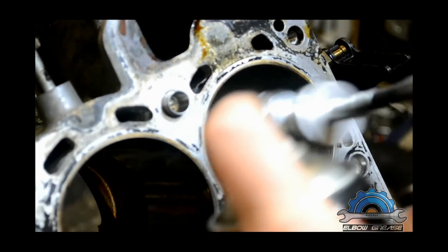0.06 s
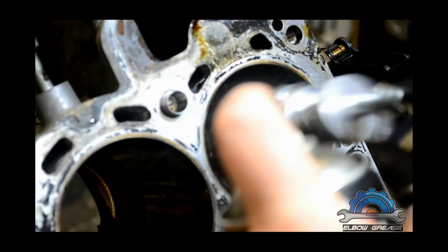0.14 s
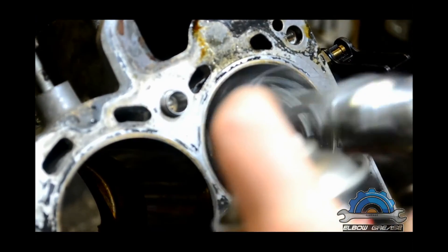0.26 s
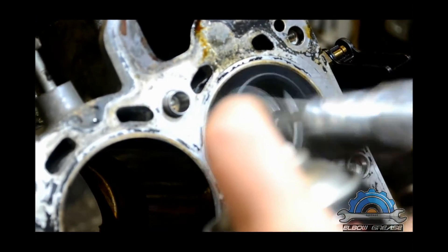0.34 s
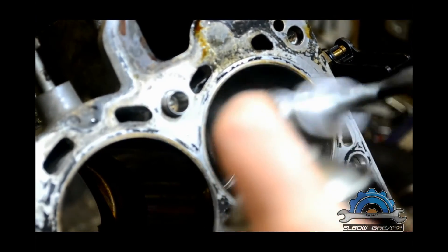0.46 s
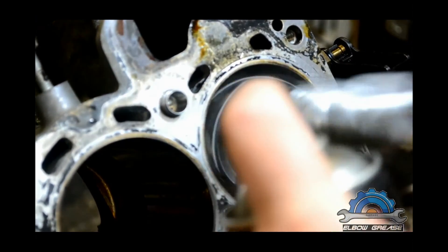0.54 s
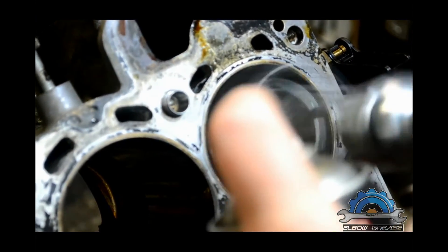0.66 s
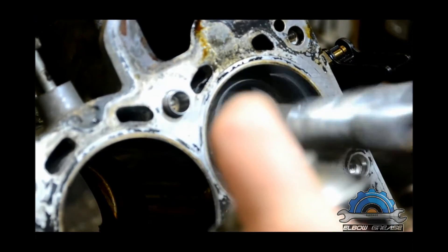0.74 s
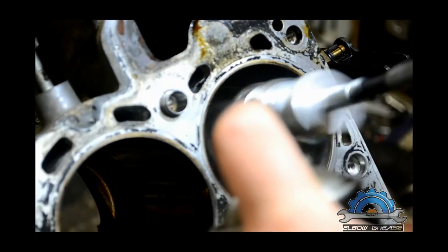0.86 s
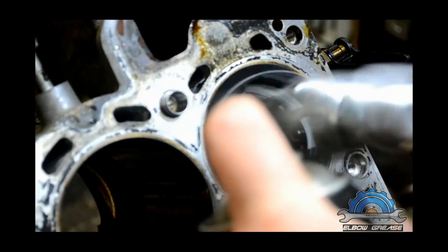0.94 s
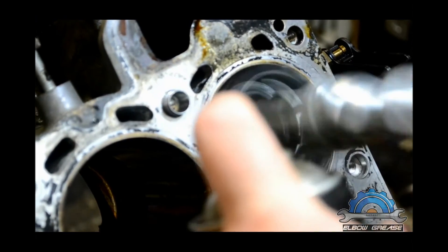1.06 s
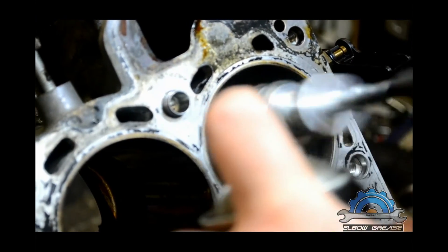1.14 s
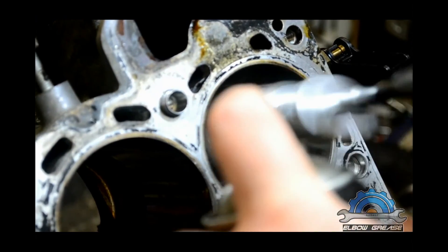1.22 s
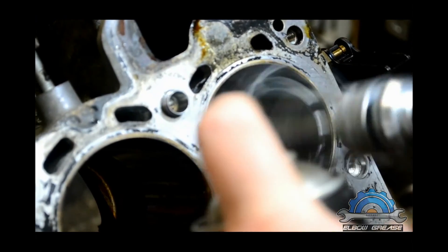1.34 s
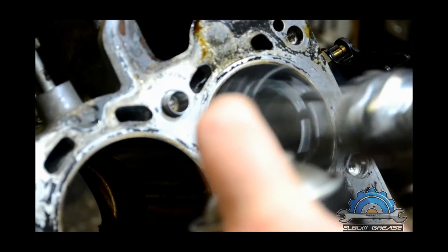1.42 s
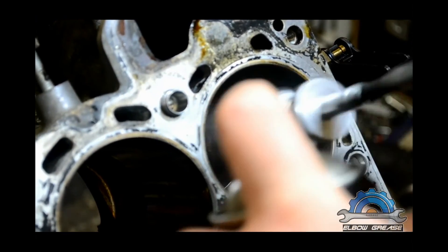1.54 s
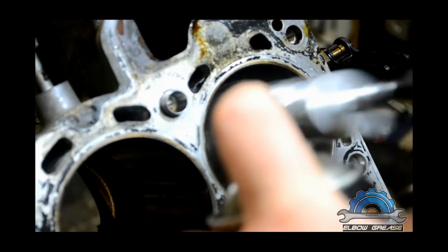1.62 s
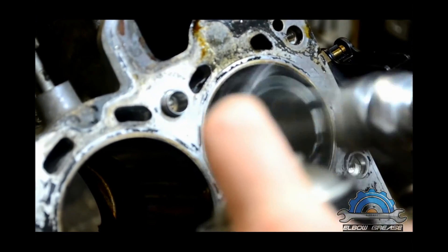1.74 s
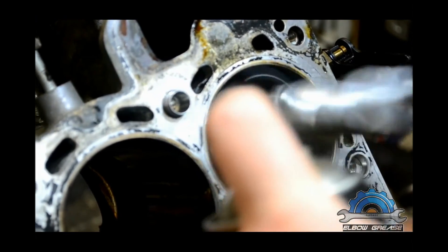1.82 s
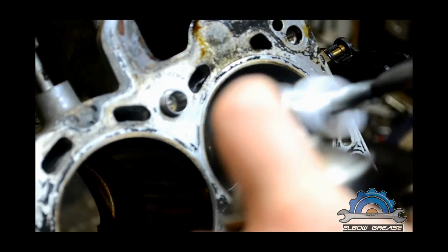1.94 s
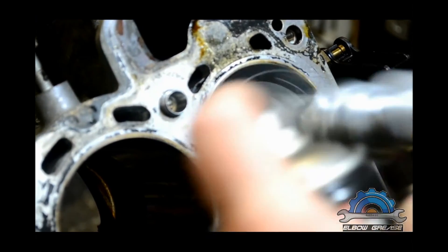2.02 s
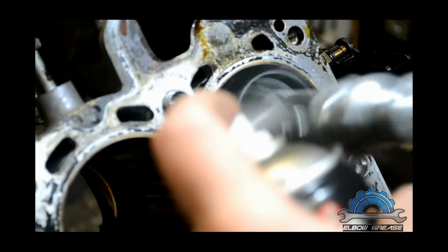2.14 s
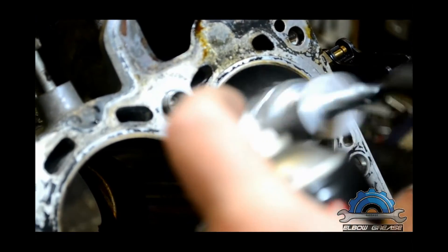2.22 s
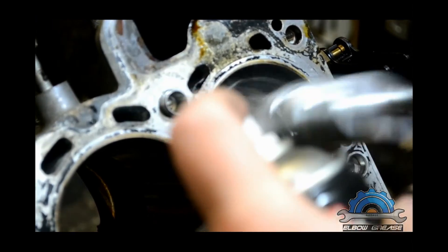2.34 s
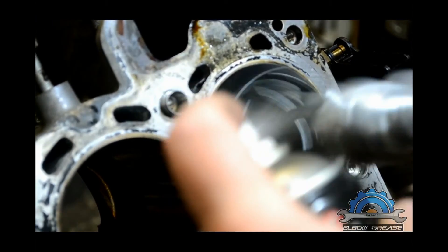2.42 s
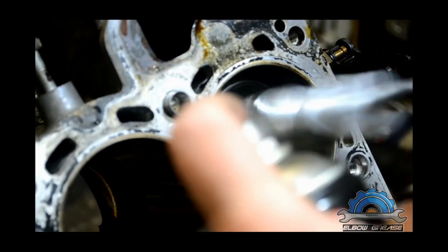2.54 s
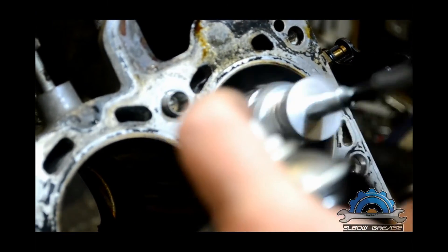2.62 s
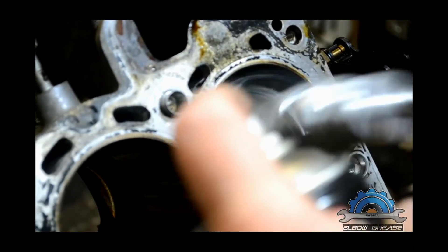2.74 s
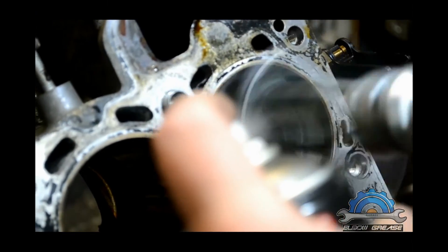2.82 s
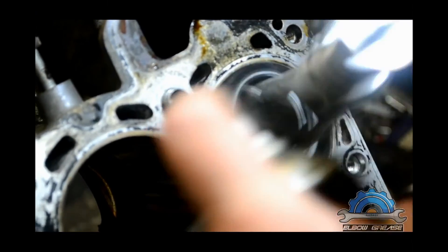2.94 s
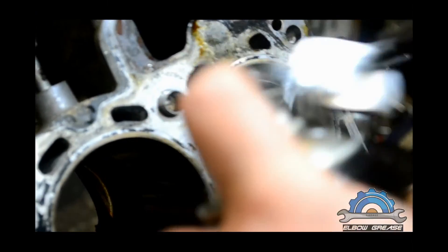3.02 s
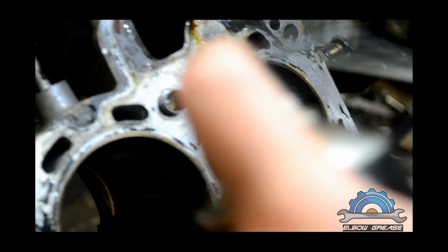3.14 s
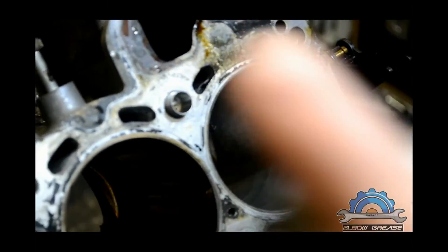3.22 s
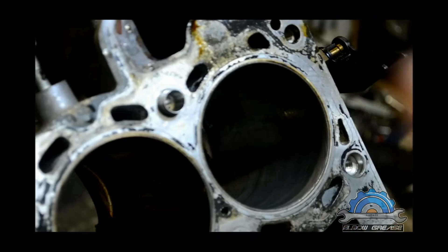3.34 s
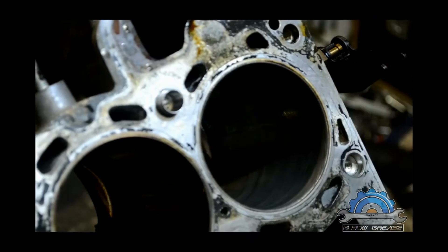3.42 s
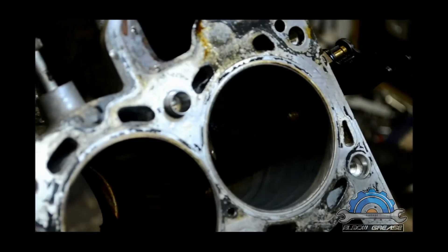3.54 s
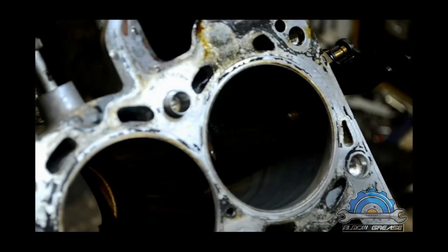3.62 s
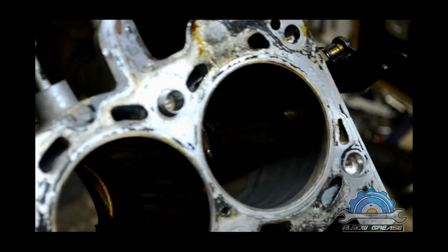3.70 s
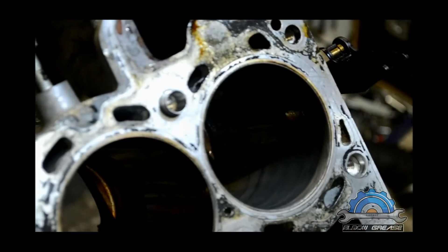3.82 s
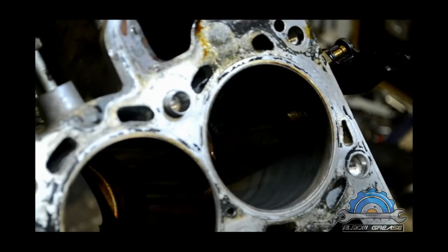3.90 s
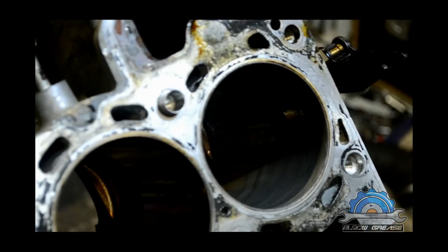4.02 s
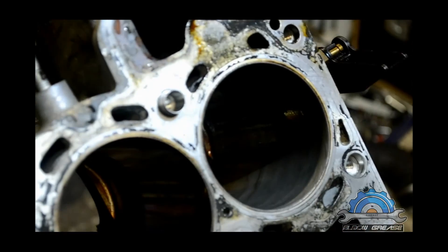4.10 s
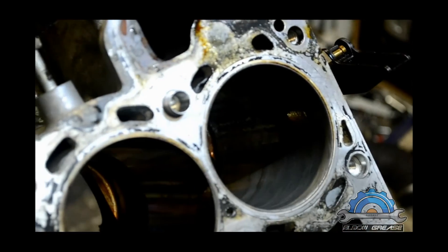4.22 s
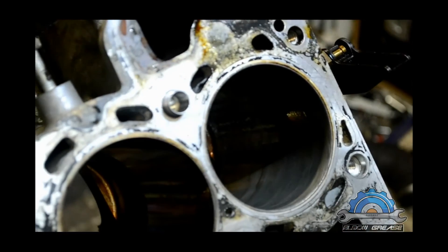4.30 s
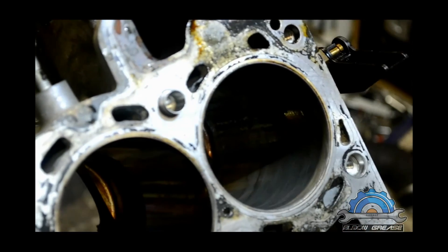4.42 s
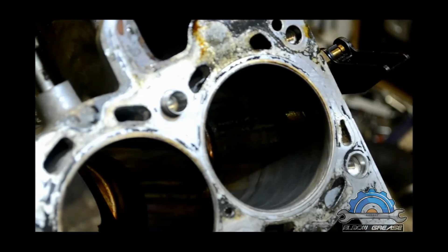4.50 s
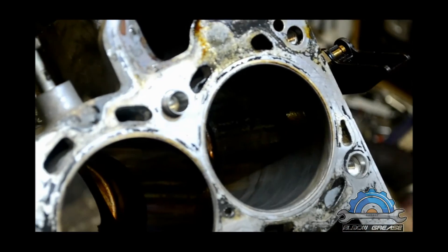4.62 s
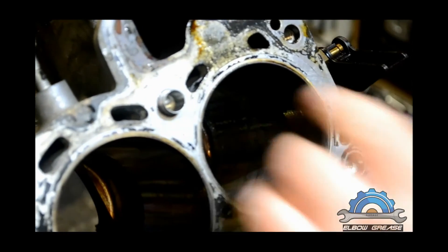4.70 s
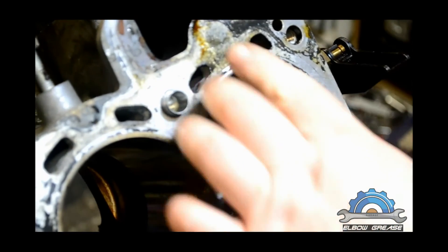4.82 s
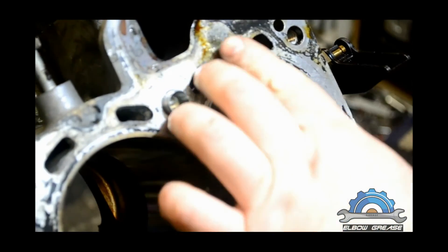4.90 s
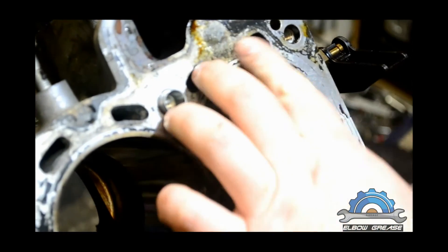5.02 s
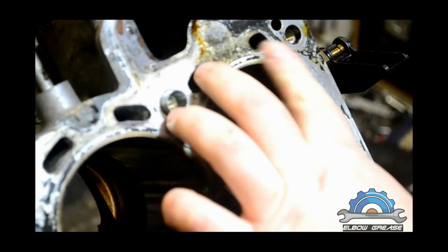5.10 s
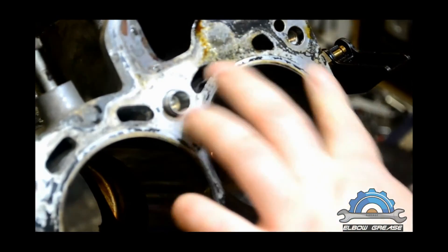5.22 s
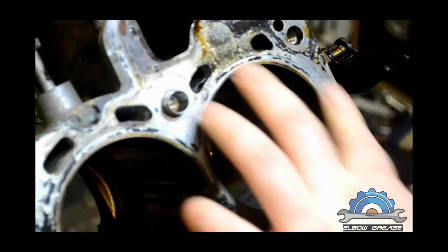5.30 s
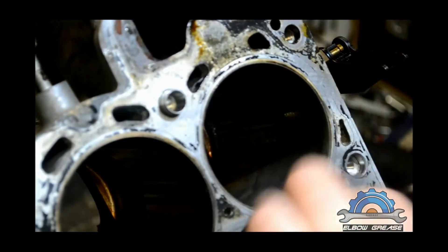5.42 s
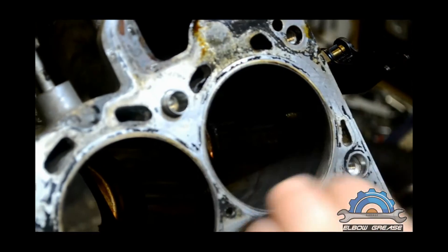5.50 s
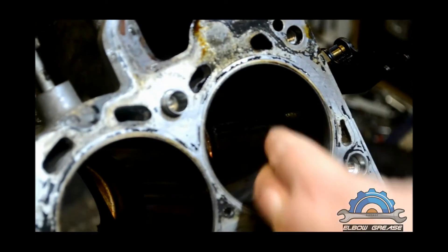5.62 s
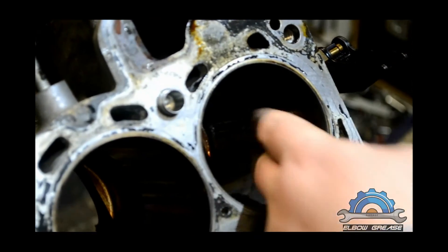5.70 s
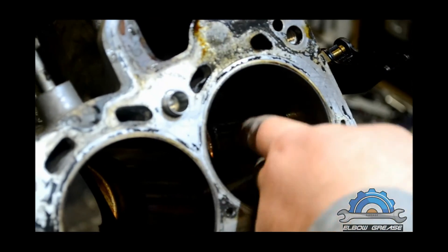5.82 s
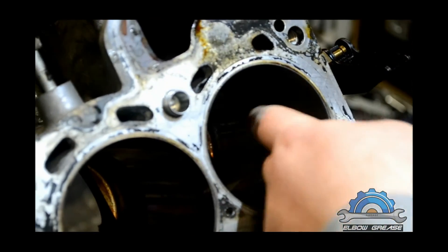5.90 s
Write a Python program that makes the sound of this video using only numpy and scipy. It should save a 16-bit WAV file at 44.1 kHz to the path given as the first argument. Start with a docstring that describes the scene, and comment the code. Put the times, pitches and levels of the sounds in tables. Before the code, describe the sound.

One close microphone, the same in both channels: loud, bright abrasive grinding with a high gear whine that sags and returns on every stroke, the bore ringing as it binds. After almost three seconds the hone slaps out of the cylinder and the drill dies quickly. Sparse thin clicks follow, then very quiet hand rubbing and cloth rustle over low garage room noise.

```python
"""In a garage, an electric drill spins a stone hone up and down an engine bore, close to one microphone.
The gears are wavering tones that sag on each stroke; the stones are bursts of shaped noise over the
drill's rush; the metal rings as noise through narrow resonances. The hone clatters out of the bore and
the drill stops: decaying bursts of noise. Then the loose arms click, as ticks with short tones, and a
hand brushes over the block, as soft swells of noise. Quiet room noise lies under it all."""
import sys
import numpy as np
from scipy import signal
from scipy.fft import rfft, irfft, next_fast_len
from scipy.io import wavfile
from scipy.ndimage import uniform_filter1d, map_coordinates

SR = 44100
rng = np.random.default_rng(int(sys.argv[2]) if len(sys.argv) > 2 else 0)


def wrap_up_sound(samples):
    """Save the sound to the file named by the first command line argument, as 16-bit audio."""
    columns = np.atleast_2d(samples).T
    # keep every value between -1 and 1, then stretch to whole-number steps
    tamed = np.clip(columns, -1, 1)
    steps = np.round(tamed * 32767).astype(np.int16)
    wavfile.write(sys.argv[1], SR, steps)


N = 262519  # length in samples

# Each stroke runs free, then binds: middle of free run t/s, middle of bind t/s, bind length t/s,
# sag of the whine f/Hz, rise of the low ring level/dB, rise of the middle ring level/dB
STROKES = [(0.02, 0.242, .15, 66.5, 11, 10), (0.4, 0.604, 0.16, 100.7, 8.5, 7.5),
           (0.764, 0.956, 0.14, 87, 6.5, 9.5), (1.1, 1.321, .11, 84.8, 6.5, 11.5),
           (1.47, 1.676, .14, 61.4, 10, 10), (1.812, 2.043, 0.099, 59.8, 16, 8.5),
           (2.173, 2.404, .1, 58, 10.5, 11), (2.526, 2.745, .06, 74.8, 20, 11.5)]
# Gear mesh when running free, drifting with the trigger: t/s, pitch f/Hz
FREE_PITCH = [(0, 2515), (.45, 2516), (.79, 2500), (1.18, 2534), (1.5, 2522), (1.85, 2515), (2.2, 2508),
              (2.6, 2529)]
# The whine dips briefly: middle t/s, length t/s, change of level/dB
WHINE_DIPS = [(2.3, .06, -9), (2.673, .035, -7)]
# Weaker lines of the drive: multiple of the motor speed, relative level/dB
DRIVE_LINES = [(.714, -44), (3.58, -25), (4, -26), (5, -32), (6, -22.5), (6.79, -31.5), (8.59, -19),
               (18, -20), (27.6, -28.5)]
# Spectrum of the grinding stones: f/Hz, relative level/dB per Hz
GRIT_SPECTRUM = [(1900, -18.5), (2600, -5), (3060, -7), (3500, -3.5), (4500, -3.5), (5050, 0), (5600, -5.5),
                 (6900, -2.5), (7900, -4.5), (8800, -3), (9300, -4.5), (10400, -5), (16000, -6.5)]
# Spectrum of the drill's rush: f/Hz, relative level/dB per Hz
RUSH_SPECTRUM = [(76, -64), (130, -27.5), (193, -23.5), (264, -25.5), (346, -12.5), (421, -14.5),
                 (590, -10), (867, -10), (1130, -8), (1430, -5.5), (1550, -11.5), (1780, -7), (2100, -3),
                 (2730, -21), (4620, -120)]
# Resonances that friction drives harder, in three groups:
# centre f/Hz, distance from centre to half gain f/Hz, relative level/dB
LOW_RING = [(1533, 22, -15), (1582, 13, 2.5), (1620, 41, -17)]
MID_RING = [(2110, 30, -15), (2203, 16, -0.5), (2310, 35, -16), (2497, 70, -9.5)]
HIGH_RING = [(4092, 16, 4), (4100, 30, 3.5), (4230, 100, -9), (4314, 40, 0), (5056, 130, -20.5),
             (6780, 90, -18.5), (8660, 50, -12.5), (10200, 30, -13)]
# Resonances that ring evenly until the stones lose touch: same columns, f/Hz, f/Hz, level/dB
EVEN_RING = [(758, 16, -9), (1120, 19, -0.5), (1192, 40, -1), (1515, 35, -5), (1690, 42, -2), (2890, 18, 0),
             (3260, 20, -1)]
# The stones scrape over the rim on the way out: middle t/s, length t/s,
# low ring level/dB, middle ring level/dB, high ring level/dB
SCRAPES = [(2.839, .055, -37, -25.5, -31), (2.88, .035, -40, -37, -28), (2.93, 0.078, -28.5, -34.5, -31),
           (3.06, .045, -33, -45.5, -26)]
# The stones catch on the wall, later on their holders, with a short chink: t/s, level/dB, f/Hz
SNAGS = [(0.221, -25, 6400), (.225, -27.5, 5000), (.945, -25, 4014), (1.11, -27.5, 6660),
         (1.236, -26, 2220), (.13, -28.5, 2226), (1.54, -24, 6813), (1.543, -32, 3450),
         (2.396, -35.5, 8776), (3.053, -27.5, 4080), (3.06, -28, 2550), (3.2, -44, 6200),
         (3.284, -52, 2835)]
# The stones strike the rim as the hone comes out: t/s, relative level/dB, relative knock level/dB
CLATTER = [(2.7202, -6, -18.5), (2.7246, -6.5, -14), (2.77, -4, -18.5), (2.806, -9, -9),
           (2.8255, -4, -12.5), (2.8764, -8.5, -22), (2.8938, 0.5, -21.5), (3.0295, -4.5, -18.5),
           (3.0388, -4, -25), (3.0477, -13, -8), (3.087, -14, -14.5), (3.099, -6, -15), (3.1984, -20, -18)]
# Spectrum of the bright crack on the rim: f/Hz, relative level/dB per Hz
RIM_SPECTRUM = [(1000, -20), (2000, -8), (3100, -6), (4700, -2), (7000, -1.5), (10000, -4.5), (16000, -5.5)]
# Spectrum of a dull knock: f/Hz, relative level/dB per Hz
KNOCK_SPECTRUM = [(150, -30), (310, 4.5), (600, 3.5), (1200, 3), (2000, -21.5), (3000, -23)]
# The loose arms click: t/s, relative level/dB, centre of the boost f/Hz, knock gain level/dB
CLICKS = [(3.236, -32.5, 5240, -16), (3.2809, -36, 2850, -15), (3.3306, -29, 8970, -22),
          (3.3584, -31, 6170, -18.5), (3.371, -35, 6300, -15.5), (3.4514, -38, 6380, -21),
          (3.861, -30, 6800, -35), (3.867, -32, 2900, -33), (3.932, -39.5, 6430, -17),
          (4.1833, -39.5, 2610, -8), (4.2306, -35.5, 7900, -22), (4.258, -34, 8900, -27),
          (4.2765, -22.5, 6400, -32), (4.2854, -40, 6100, -23), (4.291, -34, 2850, -25),
          (4.3111, -29, 9600, -25)]
# Spectrum of an arm's tick: f/Hz, relative level/dB per Hz
ARM_SPECTRUM = [(250, -17), (700, -11), (1300, -5), (2350, -1.5), (2850, 1), (3500, -8.5), (5200, 0),
                (6500, 2), (8000, -5), (9700, -3.5), (11000, -13.5), (16000, -20)]
# Ringing tones of an arm: f/Hz, relative level/dB, time to fall 60 dB t/s
ARM_RING = [(2780, 1.5, .13), (2940, 2, 0.18), (2940, -7.5, 0.11), (6140, -12, .11)]
# Skin slides over the block: middle t/s, length t/s, level/dB
BRUSHES = [(4.06, 0.33, -70.5), (4.48, .2, -77), (5.06, .17, -70), (5.22, 0.12, -65), (5.468, 0.034, -70.5),
           (5.865, .245, -62.5)]
# The sleeve rustles as the arm moves: middle t/s, length t/s, relative level/dB
RUSTLES = [(4.62, .44, -53.5), (5.18, 0.38, -55.5), (5.55, 0.33, -58)]
# Spectrum of sliding skin: f/Hz, relative level/dB per Hz
SKIN_SPECTRUM = [(2000, -21), (3300, 0), (5000, -0.5), (7200, -1), (10400, -3.5), (16000, -8)]
# Spectrum of the sleeve: f/Hz, relative level/dB per Hz
CLOTH_SPECTRUM = [(100, -27), (190, -1), (380, 3), (650, -5.5), (1500, -15.5)]
# Spectrum of the garage's quiet: f/Hz, relative level/dB per Hz
AIR_SPECTRUM = [(20, -24.5), (50, -15), (110, -8.5), (190, -4.5), (330, -1), (650, -6), (1100, -8.5),
                (1830, -14.5), (3400, -21.5), (6000, -31), (10000, -36), (16000, -42)]
# Narrow bands of the garage: centre f/Hz, distance to half gain f/Hz, relative level/dB
HUM_BANDS = [(66.5, 12, 0), (195.8, 25, -5.5), (2700, 60, -10)]
# Gain of the microphone: f/Hz, level/dB
MICROPHONE = [(10, 1.5), (7550, 0.5), (7900, -6), (8300, 1.5), (10200, 1), (10800, -7.5), (11750, -28.5),
              (13600, -25.5), (16500, -33.5)]

PINION_TEETH = 9
WHINE_DB, WHINE_DIP_DB = -27, 4  # base level of the gear mesh; its loss under full load
FREE_RISE_DB, FREE_RUN_S = 3.5, 0.15  # the mesh sings out where the hone runs free; for how long
GRIT_DB, RUSH_DB, BIND_DB = -26.5, -36, 0  # grinding, drill's rush, their gain under full load
EXIT_S, CLEAR_S = 2.76, 3.07  # the hone leaves the bore; the stones lose touch with the metal
STOP_S, RUN_DOWN_S = 3.119, 0.33  # the trigger is let go; time to fall 60 dB
COAST_DB, REST_S = -29, 3.37  # coasting hone against the running one; its last fade begins
TOP_HZ = 15750  # nothing passes the microphone from here up


def amp(db):
    """Turn decibels into gain."""
    return 10 ** (np.asarray(db) / 20)


def unit(x):
    """Scale a sound to an rms (average strength) of 1."""
    return x / np.sqrt(np.mean(x ** 2) + 1e-20)


def curves(rows):
    """Draw one curve over the whole scene for each column after the time."""
    s, *columns = np.transpose(rows)
    return [np.interp(np.arange(N) / SR, s, column) for column in columns]


def until(end, fade):
    """Stay at full level up to end, then fall 60 dB every fade seconds."""
    return amp(-60 * np.maximum(np.arange(N) / SR - end, 0) / fade)


def swell(middle, length, steep=3):
    """Rise and fall roundly from 0 to 1, staying above half height for length seconds."""
    distance = np.abs(2 * (np.arange(N) / SR - middle) / length)
    return 0.5 ** (distance ** steep)


def load():
    """Give each stroke's load (0 to 1) over time, one row a stroke."""
    return np.array([swell(s, length) for _, s, length, *_ in STROKES])


def wobble(rate):
    """Draw a smooth random curve through rate random points a second."""
    points = rng.standard_normal(int(N * rate / SR) + 4)
    return map_coordinates(points, [np.arange(N) * rate / SR])


def filtered(x, response):
    """Multiply the spectrum of x by a gain that depends on frequency."""
    m = next_fast_len(len(x) + 8192)
    gain = response(np.fft.rfftfreq(m, 1 / SR))
    return irfft(rfft(x, m) * gain, m)[:len(x)]


def shape(points, hz):
    """Join (Hz, dB) points into a gain curve on a log frequency axis."""
    f, db = np.transpose(points)
    return amp(np.interp(np.log(hz + 1), np.log(f + 1), db, left=-120, right=-120))


def noise(points, size=N):
    """Make noise of rms 1 with the given spectrum."""
    return unit(filtered(rng.standard_normal(size), lambda hz: shape(points, hz)))


def rubbed(modes):
    """Keep resonances ringing by random friction: noise through narrow peaks, rms 1."""
    def response(f):
        return sum(amp(db) / (1 + ((f - hz) / width) ** 2) for hz, width, db in modes)
    return unit(filtered(rng.standard_normal(N), response))


def patchy(x, depth_db):
    """Give x brief random patches of brighter and duller colour."""
    z = signal.stft(x, nperseg=256)[2]
    field = uniform_filter1d(rng.standard_normal(z.shape), size=4, axis=0)  # smooth over frequency
    field = uniform_filter1d(field, size=7, axis=1)  # smooth over time
    return unit(signal.istft(z * amp(depth_db * unit(field)), nperseg=256)[1][:N])


def blow(t, crack_t60, tail_db, tail_t60, attack=0.00051):
    """Shape a contact in time: a short crack, then the ring of metal and room (times in s)."""
    crack = amp(-60 * t / crack_t60)
    tail = amp(tail_db - 60 * t / tail_t60)
    return (1 - np.exp(-t / attack)) * np.hypot(crack, tail)


def add(track, s, sound):
    """Mix a sound into the track at s seconds."""
    part = track[round(s * SR):][:len(sound)]
    part += sound[:len(part)]


def gears(flutter=0.002, rough=0.038, waver_db=1.47, shake_db=1.82, lines_db=-23, line_waver_db=3.5):
    """The meshing teeth sing loudest when free, and sag and fade under load; weaker lines follow."""
    loads, sag_hz = load(), np.transpose(STROKES)[3]
    free = sum(swell(s, FREE_RUN_S) for s, *_ in STROKES)
    pitch_hz = curves(FREE_PITCH)[0] - sag_hz @ loads
    # the teeth pass once each per turn, so the mesh pitch gives the motor's turns
    turns = np.cumsum(pitch_hz * (1 + flutter * wobble(90))) / SR / PINION_TEETH

    dip_db = sum(db * swell(s, length) for s, length, db in WHINE_DIPS)
    level_db = WHINE_DB + FREE_RISE_DB * free - WHINE_DIP_DB * loads.sum(0) + dip_db
    # uneven tooth contact shakes the strength of the mesh tone
    uneven = amp(waver_db * wobble(22.02) + shake_db * wobble(60)) * (1 + rough * wobble(330))
    mesh = amp(level_db) * uneven * np.sin(2 * np.pi * PINION_TEETH * turns)

    lines = np.zeros(N)
    for order, db in DRIVE_LINES:
        strength = amp(db + lines_db + line_waver_db * wobble(25))
        lines += strength * np.sin(2 * np.pi * order * turns + 0.6 * wobble(50))
    return np.sqrt(2) * (mesh * until(EXIT_S, 0.2) + lines * until(CLEAR_S, 0.2))


def stones(grain_db=1.0, chatter_db=0.4, rim_grit_db=2.4, rim_rush_db=3.3, free_db=-3):
    """Grains scratch the wall in dense, uneven bursts over the drill's rush; both die in the coast."""
    t = np.arange(N) / SR
    # lighter once the stones are out of the bore, stronger while they cross the rim
    out_of_bore = np.clip((t - 2.93) / 0.08, 0, 1)
    contact_db = BIND_DB * load().sum(0) + free_db * out_of_bore
    on_rim = swell(2.88, 0.32)
    coasting = amp(COAST_DB) * until(REST_S, 0.186)
    running = amp(contact_db) * np.hypot(until(STOP_S, RUN_DOWN_S), coasting)

    bursts = unit(amp(grain_db * wobble(1400) + chatter_db * wobble(130)))
    scratching = bursts * patchy(noise(GRIT_SPECTRUM), depth_db=2.0)
    grit = amp(GRIT_DB + rim_grit_db * on_rim) * scratching
    rush = amp(RUSH_DB + rim_rush_db * on_rim) * noise(RUSH_SPECTRUM)
    return running * (grit + rush)


def metal(low_db=-44, mid_db=-42, high_db=-36.5, high_rise_db=4.0, chatter_db=1.1, even_db=-39.5):
    """Chattering friction makes bore and hone ring, most at each stroke's loaded end and on the rim."""
    loads, (low_rise, mid_rise) = load(), np.transpose(STROKES)[4:]
    low = low_db + low_rise @ loads
    mid = mid_db + mid_rise @ loads
    high = high_db + high_rise_db * loads.sum(0)
    in_bore = amp([low, mid, high])
    on_rim = sum(np.outer(amp(ring_db), swell(s, length)) for s, length, *ring_db in SCRAPES)

    rings = amp(even_db) * rubbed(EVEN_RING)
    for drive, modes in zip(np.hypot(in_bore, on_rim), (LOW_RING, MID_RING, HIGH_RING)):
        rings += drive * unit(amp(chatter_db * wobble(160)) * rubbed(modes))
    return rings * until(CLEAR_S, 0.21)


def snags(width_hz=220, t60=0.21):
    """A catching stone rings one narrow band of its holder."""
    out, t = np.zeros(N), np.arange(SR // 4) / SR
    for s, db, hz in SNAGS:
        band = lambda f: 1 / (1 + ((f - hz) / width_hz) ** 2)
        ring = unit(filtered(rng.standard_normal(len(t)), band))
        envelope = blow(t, crack_t60=0.033, tail_db=-0.5, tail_t60=t60, attack=0.003)
        add(out, s, amp(db) * envelope * ring)
    return out


def clatter(crack_db=-7, thud_db=-12):
    """Spinning stones slap the rim: a bright crack over a duller knock."""
    out, t = np.zeros(N), np.arange(SR // 2) / SR
    for s, db, knock_db in CLATTER:
        envelope = blow(t, crack_t60=0.017, tail_db=-6.5, tail_t60=0.1213)
        crack = amp(crack_db) * envelope * noise(RIM_SPECTRUM, size=len(t))
        knock = amp(thud_db + knock_db - 60 * t / 0.097) * noise(KNOCK_SPECTRUM, size=len(t))
        add(out, s, amp(db) * (crack + knock))
    return out


def clicks(level_db=-5, focus_db=6, focus_hz=600, ring_db=-25):
    """Each tap of a loose steel arm is a coloured tick, a short ring and a dull knock."""
    out, t = np.zeros(N), np.arange(SR // 2) / SR
    for s, db, bright_hz, knock_db in CLICKS:
        # boost the tick around one frequency
        colour = lambda hz: amp(focus_db / (1 + ((hz - bright_hz) / focus_hz) ** 2))
        coloured = unit(filtered(noise(ARM_SPECTRUM, size=len(t)), colour))
        tick = blow(t, crack_t60=0.0083, tail_db=-12.5, tail_t60=0.15) * coloured

        ring = np.zeros(len(t))
        for hz, mode_db, t60 in ARM_RING:
            varied_db = mode_db + 2 * rng.standard_normal()
            ring += amp(varied_db - 60 * t / t60) * np.sin(2 * np.pi * hz * t)

        # the knock swells and lingers in the room
        envelope = blow(t, crack_t60=0.02, tail_db=0, tail_t60=0.29, attack=0.0025)
        knock = envelope * noise(KNOCK_SPECTRUM, size=len(t))
        add(out, s, amp(db + level_db) * (tick + amp(ring_db) * ring + amp(knock_db) * knock))
    return out


def hand(deck_db=-4.5, cloth_db=-3, grain_db=2):
    """A sleeve rustles and fingers slide over the metal; the deck rings faintly as they cross it."""
    moves = lambda rows: sum(amp(db) * swell(s, length) for s, length, db in rows)
    deck = amp(deck_db) * swell(5.25, 0.7) * rubbed(HIGH_RING)
    grain = amp(grain_db * wobble(300))
    skin = moves(BRUSHES) * grain * (noise(SKIN_SPECTRUM) + deck)
    sleeve = amp(cloth_db) * moves(RUSTLES) * noise(CLOTH_SPECTRUM)
    return skin + sleeve


def garage(air_db=-58, hum_db=-65):
    """Steady room noise with a low hum and a faint high band."""
    return amp(air_db) * noise(AIR_SPECTRUM) + amp(hum_db) * rubbed(HUM_BANDS)


def scene():
    """Add all sources at one microphone, the same in both channels."""
    drilling = gears() + stones() + metal() + snags()
    mono = drilling + clatter() + clicks() + hand() + garage()
    return np.array([mono, mono])


def record(dry):
    """The microphone has a notch in the treble, a drop above it and a steep band limit."""
    response = lambda hz: shape(MICROPHONE, hz) * (hz < TOP_HZ)
    return np.array([filtered(x, response) for x in dry])


dry = scene()
out = record(dry)
wrap_up_sound(out)
```